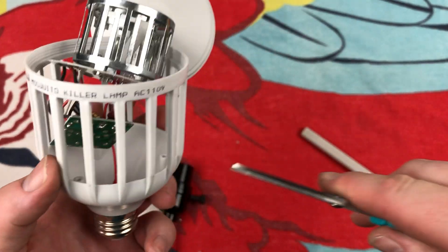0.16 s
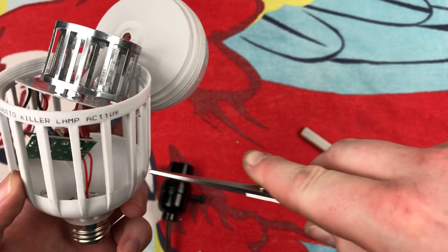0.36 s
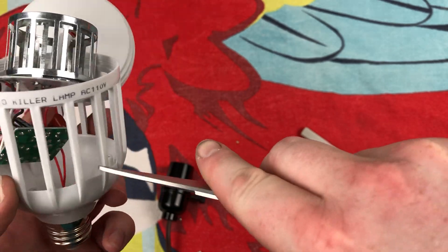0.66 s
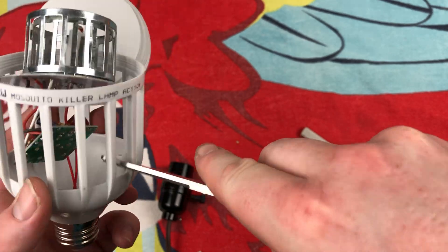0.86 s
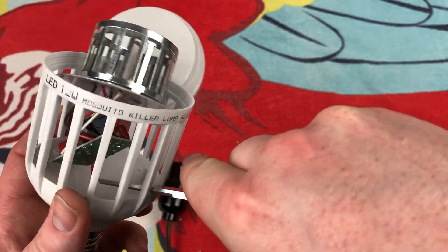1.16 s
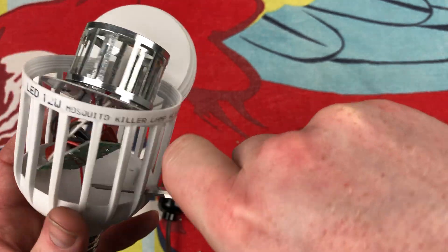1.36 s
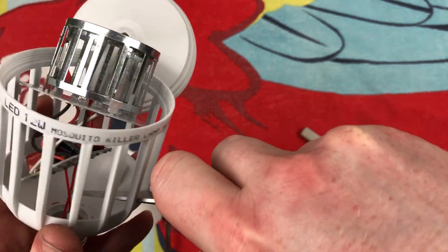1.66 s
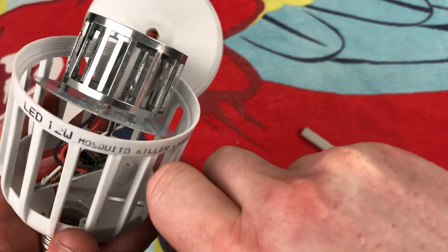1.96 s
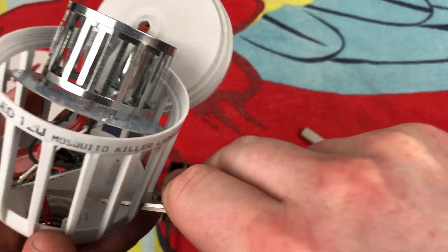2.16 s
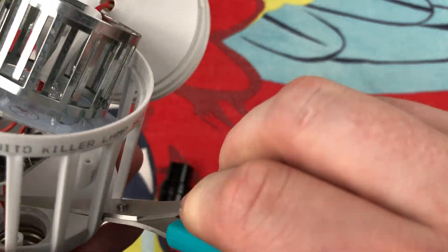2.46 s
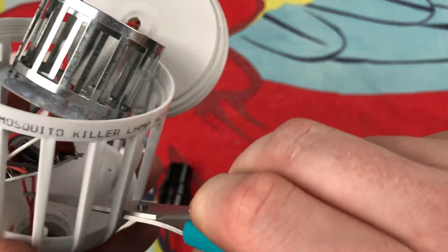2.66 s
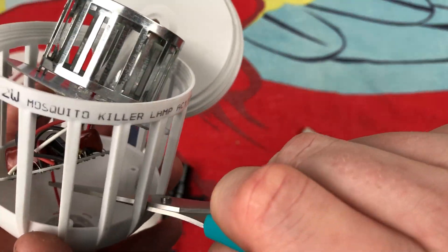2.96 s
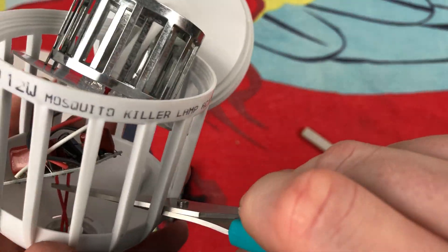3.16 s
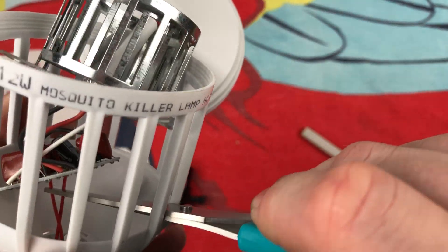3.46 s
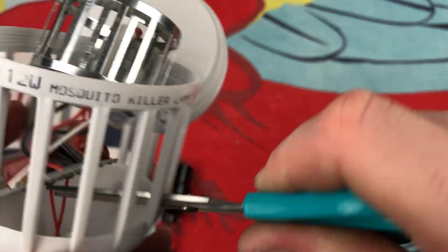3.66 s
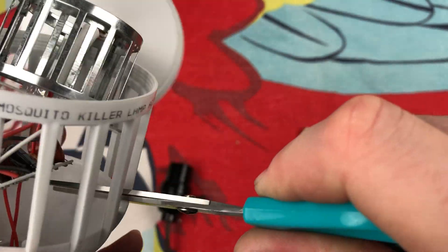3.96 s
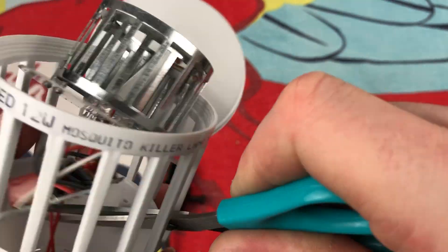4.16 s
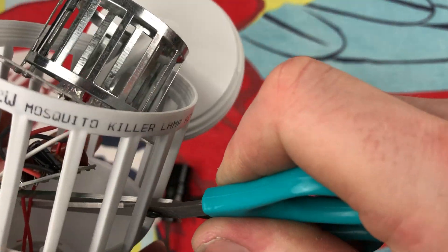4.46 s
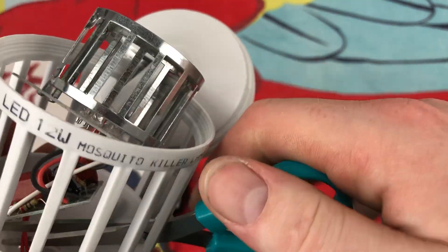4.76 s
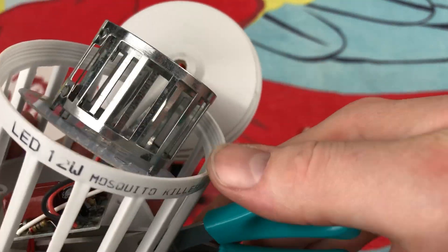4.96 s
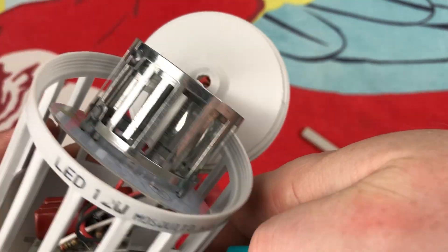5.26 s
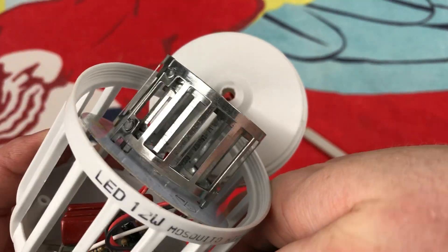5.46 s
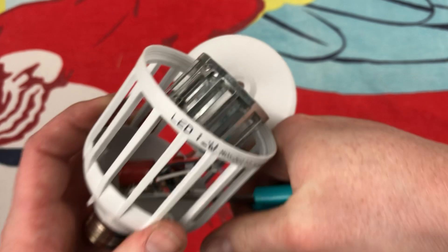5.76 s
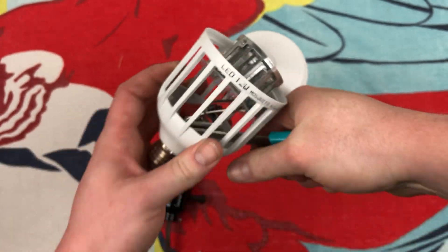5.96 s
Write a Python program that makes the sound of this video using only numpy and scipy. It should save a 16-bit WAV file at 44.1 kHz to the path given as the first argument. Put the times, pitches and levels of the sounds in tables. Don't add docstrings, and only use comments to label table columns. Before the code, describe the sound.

Steel blades rub and tick against thin plastic, handled quietly at first, then more busily, with pauses between. Light hollow thumps follow the harder touches, and the open blades briefly sing. After a sharp knock and some small fumbling, one crisp, bright snip cuts a wire and bounces off nearby walls. A few last clicks follow. Close microphone, small indoor room, soft boomy background with slight hiss and mains hum.

```python
import sys
import numpy as np
from scipy import signal
from scipy.fft import rfft, irfft
from scipy.io import wavfile
from scipy.ndimage import uniform_filter1d

SR = 44100
rng = np.random.default_rng(int(sys.argv[2]) if len(sys.argv) > 2 else 0)


def convert_level_to_amplitude(level_db):
    exponent = np.asarray(level_db, float) / 20
    return 10 ** exponent


def transcribe(u):
    v = np.clip(np.atleast_2d(u).T, -1, 1)
    q = np.round(v * 32767).astype(np.int16)
    wavfile.write(sys.argv[1], SR, q)


N = 269123
CUT_S = 5.7499

# f/Hz, level/dB, t60/s
BLADE_MODES = [(1247, -3, 0.088), (1712, -2, 0.11), (2007, 4.5, 0.064), (2800, 3.5, 0.1), (3020, 4, 0.06),
               (3780, -0.5, 0.088), (4510, -11, .03), (5355, 4.5, 0.055), (6670, -1, 0.025),
               (7810, -22, 0.032), (8900, -4, 0.023), (10130, -5.5, 0.019), (10950, -4, .04),
               (13000, -30.5, 0.018)]


def evened(x):
    return x / np.sqrt(np.mean(x ** 2) + 1e-20)


def read(points, hz):
    f, value = np.transpose(points)
    return np.interp(np.log(hz + 1), np.log(f + 1), value)


def add(mix, s, sound):
    part = mix[round(s * SR):][:len(sound)]
    part += sound[:len(part)]


def coloured(x, points):
    gain = convert_level_to_amplitude(read(points, np.fft.rfftfreq(len(x), 1 / SR)))
    return irfft(rfft(x) * gain, len(x))


def band(x, lo_hz, hi_hz):
    edges = np.clip([lo_hz, hi_hz], 20, .49 * SR)
    return signal.sosfilt(signal.butter(2, edges, "band", fs=SR, output="sos"), x)


def split(x, low_hz, high_hz):
    hz, z = np.fft.rfftfreq(len(x), 1 / SR), rfft(x)
    below_low, below_high = [1 / (1 + (hz / edge) ** 6) for edge in (low_hz, high_hz)]
    shares = (below_low, below_high - below_low, 1 - below_high)
    return [evened(irfft(z * share, len(x))) for share in shares]


def ring(hz, db, t60, size=4096):
    t = np.arange(size) / SR
    return convert_level_to_amplitude(db - 60 * t / max(t60, .002)) * np.sin(2 * np.pi * hz * t)


def wander(smooth_s):
    size = max(int(smooth_s * SR), 2)
    return evened(uniform_filter1d(uniform_filter1d(rng.standard_normal(N), size), size))


def background():
    # f/Hz, level/dB per Hz
    air_colour = [(30, -19.5), (60, -12.5), (100, -10.5), (150, -16.5), (240, -18.5), (400, -23.5),
                  (600, -30.5), (1500, -36.5), (3000, -39.5), (8700, -41), (15600, -46), (16100, -61.5)]
    # f/Hz, drift/Hz, level/dB
    room_mode = (58, 1.49, 2.2)
    # t/s, level/dB
    boom_swell = [(0.0, -63), (1.7, -59), (2.14, -65.5), (2.16, -61.5), (2.79, -63.5), (2.84, -83),
                  (3.09, -58), (3.21, -70.5), (3.69, -59.5), (3.75, -69), (4.2, -60), (4.4, -65),
                  (4.62, -63), (4.72, -71), (5.57, -60.5), (5.72, -78), (6.05, -61.5), (6.1, -76.5)]
    # f/Hz, level/dB
    hum_tones = [(120, -69), (234, -85)]
    t = np.arange(N) / SR
    air = coloured(rng.standard_normal(N), air_colour) * convert_level_to_amplitude(.8 * wander(0.083))
    air *= convert_level_to_amplitude(-69.5) / np.std(band(air, 150, 16000))

    mode_hz, drift_hz, mode_db = room_mode
    boom_level = convert_level_to_amplitude(mode_db + 2.6 * wander(0.049) + np.interp(t, *np.transpose(boom_swell)))
    boom_turns = np.cumsum(mode_hz + drift_hz * wander(0.058)) / SR
    boom = boom_level * np.sin(2 * np.pi * boom_turns)

    hum = np.zeros(N)
    for hz, db in hum_tones:
        hum += convert_level_to_amplitude(db + 1.5 * wander(0.13)) * np.sqrt(2) * np.sin(2 * np.pi * hz * t)
    return air + boom + hum


def pressure(start, length, level_db):
    rise_db_per_s, fall_db_per_s, swell_db = 1495, 1005, -0.5
    t = np.arange(N) / SR - start
    rise = np.minimum(rise_db_per_s * t, 0)
    hold = swell_db * (t / length - .5).clip(-.5, .5)
    release = swell_db / 2 - fall_db_per_s * (t - length)
    return convert_level_to_amplitude(level_db + np.minimum(rise + hold, release))


def patchy(x, depth_db):
    z = signal.stft(x, nperseg=256)[2]
    patches = uniform_filter1d(rng.standard_normal(z.shape), size=3, axis=0)
    patches = uniform_filter1d(patches, size=16, axis=1)
    return evened(signal.istft(z * convert_level_to_amplitude(depth_db * evened(patches)), nperseg=256)[1][:N])


def scrape(grit_db=2.3, lumps_db=1.0, grip_db=4.5, ringing=.38, patch_db=2.5):
    # f/Hz, level/dB per Hz
    rub_colour = [(200, -3), (700, -24), (1500, -9), (3000, 1.5), (6000, -2.5), (10000, -4.5), (15700, -11),
                  (16100, -40)]
    # f/Hz, level/dB, t60/s
    squeak_modes = [(2760, 6, 0.03), (2900, 12.5, 0.025), (3150, 7, 0.02), (8940, -1.5, 0.023),
                    (9300, -2, 0.026), (3800, 3, .01)]
    # t/s, length/s, pressure/dB, brightness/dB, cage body/dB
    strokes = [(0.0, 0.009, -55, -9, -11), (.925, 0.051, -60.5, 0.5, -1), (1.057, 0.11, -65.5, -2, -9),
               (1.181, 0.027, -62, 0.5, -7.5), (1.265, 0.026, -62, -7, -4), (1.686, 0.055, -68, -4, -5),
               (1.737, 0.016, -55.5, -21, -11), (1.972, 0.065, -57, -3.5, -12),
               (2.063, 0.017, -55.5, -26, -33), (2.161, 0.038, -67, -10, -1),
               (2.374, 0.049, -53, -5.5, -12), (2.451, 0.0085, -59.5, -14, -4.5),
               (2.489, 0.0057, -53.5, -8, -9), (3.703, 0.059, -61, -3.5, -12),
               (3.764, 0.029, -55, 1.5, -16), (3.8, 0.038, -58.5, -2, -17), (3.864, 0.029, -65.5, 5, -7),
               (3.899, 0.03, -59, 7, -10), (4.168, 0.038, -58.5, 3, -10), (4.223, 0.017, -55, 7.5, -4.5),
               (4.271, 0.0037, -47.5, -13, -8), (4.694, 0.034, -60.5, 3, -1),
               (4.735, 0.022, -54.5, 0, -5.5), (4.756, 0.028, -59, -6, -2), (5.061, 0.023, -65, -1, -6),
               (5.186, 0.0069, -63.5, 1.5, -5), (5.652, 0.032, -65, -2.5, -5.5)]
    # t/s, length/s, pressure/dB, brightness/dB
    brushes = [(0.052, 0.038, -69, -11), (0.2, 0.029, -73, 2), (0.492, 0.039, -75, -20),
               (0.666, 0.0061, -71, -18), (0.843, 0.089, -71.5, -2), (0.99, 0.078, -77.5, 2.5),
               (1.224, 0.06, -67.5, -5), (1.3, 0.021, -65, -17), (1.327, 0.04, -76, -3),
               (1.458, 0.01, -72.5, -3.5), (1.936, 0.026, -77, -11), (2.071, 0.035, -69, -8),
               (2.73, 0.036, -76.5, 0), (3.214, 0.04, -81, 2), (3.32, 0.01, -69, -6), (3.97, 0.21, -79, -4),
               (4.44, 0.015, -73, -4), (5.375, 0.013, -65.5, -5), (5.551, 0.056, -77.5, -2),
               (1.484, 0.013, -84, -17), (1.618, 0.016, -77, -8), (1.771, 0.022, -68, -25),
               (1.831, 0.009, -70, 4), (2.304, 0.028, -72, -12), (2.524, 0.0091, -64, -6),
               (2.591, 0.023, -72.5, -4), (2.802, 0.072, -74, 0), (3.25, 0.078, -69, -3),
               (3.625, 0.013, -71.5, -12), (3.915, 0.038, -60.5, -29), (4.307, 0.023, -69, -21),
               (4.593, 0.084, -73, -3), (4.774, 0.047, -68, -29), (5.213, 0.018, -66, -24),
               (5.284, 0.046, -75.5, -3), (5.424, 0.0038, -70, 0), (5.457, 0.01, -69, -7),
               (6.058, 0.0045, -71, 8)]
    # t/s, length/s, level/dB
    songs = [(1.005, 0.084, -75), (1.212, 0.13, -83), (2.433, 0.057, -76), (2.598, 0.045, -76),
             (2.742, 0.027, -65.5), (2.818, 0.061, -71), (2.941, .03, -70.5), (3.027, 0.12, -78),
             (3.16, 0.066, -78), (3.24, 0.085, -65), (3.54, 0.14, -81), (3.71, 0.12, -63),
             (4.225, 0.0099, -53), (4.549, 0.075, -68.5), (4.651, 0.018, -67), (4.695, 0.058, -57.5),
             (1.06, 0.072, -88), (4.475, 0.05, -76), (5.05, 0.18, -74), (5.3, 0.084, -69),
             (6.043, 0.071, -60.5), (2.56, .8, -86), (4.5, .2, -80)]
    slips = rng.standard_normal(N) * convert_level_to_amplitude(grit_db * wander(0.0012) + lumps_db * wander(0.005))
    modes = np.zeros(N)
    for hz, db, t60 in BLADE_MODES:
        gripped = slips * convert_level_to_amplitude(grip_db * wander(0.026))
        modes += signal.oaconvolve(gripped, ring(hz, db, .5 * t60))[:N] / np.sqrt(t60)
    rub = patchy(coloured(slips, rub_colour), patch_db) + ringing * evened(modes)
    body, mid, top = split(band(rub, 250, 21000), 1200, 6500)
    squeak = evened(signal.oaconvolve(slips, sum(ring(*m) for m in squeak_modes))[:N])

    out = np.zeros(N)
    brush_body_db = -8
    for *stroke, bright_db, body_db in list(strokes) + [(*row, brush_body_db) for row in brushes]:
        out += pressure(*stroke) * (mid + convert_level_to_amplitude(bright_db) * top + convert_level_to_amplitude(body_db) * body)
    for row in songs:
        out += pressure(*row) * squeak
    return out


def lock(start, end, hz, level_db, spread=0.058):
    size = round((end - start) * SR)
    tone = band(rng.standard_normal(8192), (1 - spread) * hz, (1 + spread) * hz)[:size]
    return start, convert_level_to_amplitude(level_db) * evened(tone) * signal.windows.tukey(size, .6)


def add_locks(near):
    locked_tones = [(.925, 0.975, 7670, -59), (1.074, 1.17, 8500, -65), (2.37, 2.44, 6000, -69),
                    (1.977, 2.034, 5540, -61), (1.979, 2.033, 8700, -60.5), (2.733, 2.773, 9600, -72.5),
                    (3.777, 3.805, 3840, -55), (3.855, 3.94, 5540, -56.5), (4.548, 4.64, 3350, -68),
                    (4.61, 4.685, 7100, -73.5), (4.65, 4.69, 3940, -69), (4.722, 4.752, 5000, -62),
                    (1.265, 1.3, 7300, -63), (1.275, 1.295, 8400, -66), (1.308, 1.325, 10900, -62),
                    (2.74, 2.78, 3960, -76), (1.17, 1.21, 5800, -63.5), (1.07, 1.12, 4470, -66),
                    (.925, .975, 870, -61), (5.652, 5.67, 7600, -65), (5.417, 5.432, 6780, -66.5),
                    (1.69, 1.77, 10000, -80), (0.055, 0.074, 3500, -66.5), (3.02, 3.16, 8800, -81.5),
                    (0.66, 0.68, 6300, -71), (2.19, 2.23, 3000, -74.5), (5.042, 5.09, 7600, -69),
                    (6.066, 6.078, 3000, -43.5), (2.38, 2.4, 5100, -55), (2.402, 2.43, 6800, -58),
                    (4.77, 4.784, 3800, -59), (4.772, 4.786, 2600, -56), (1.263, 1.287, 1200, -60),
                    (.924, .938, 3300, -58), (.93, .952, 5200, -60), (5.762, 5.787, 2050, -45)]
    for row in locked_tones:
        add(near, *lock(*row))


def tick(s, blow_db, hz, thump_db, bright_db):
    t = np.arange(4096) / SR
    noise, chance = rng.standard_normal(4096), rng.standard_normal(len(BLADE_MODES) + 1)
    crack = noise * (np.exp(-t / 0.001) + 0.45 * np.exp(-t / 0.0068))
    crack = 1.23 * evened(crack) + 0.45 * evened(band(crack, 0.73 * hz, 1.38 * hz))
    blades = sum(ring(f, db + 7.5 * k, 0.8 * d) for k, (f, db, d) in zip(chance, BLADE_MODES))
    t60 = 1.2 / np.sqrt(hz) + 0.058 * (abs(hz - 2000) < 90)
    clink = evened(crack) + 0.18 * evened(blades) + 0.54 * evened(ring(hz, 0, t60))

    knock = ring(400 * convert_level_to_amplitude(0.19 * chance[-1]), 0, 0.045)
    knock += ring(160, -.4 * (blow_db + 80), 0.088)
    knock += ring(857, -0.66, 0.022) + ring(683, -6.0, 0.024)

    parts = evened(band(band(clink, 540, 6130), 450, 6700))
    parts += convert_level_to_amplitude(bright_db) * evened(band(band(clink, 6170, 12700), 4800, 15400))
    parts += convert_level_to_amplitude(thump_db) * evened(knock)
    return s, convert_level_to_amplitude(blow_db - 17.0) * parts * np.minimum(t / 0.000095, 1)


def add_ticks(near):
    # t/s, blow/dB, ring f/Hz, brightness/dB
    clinks = [(0.056, -53, 5600, -5), (0.1816, -53, 3020, -8), (0.1938, -70.5, 9600, 25),
              (1.1732, -55.5, 4660, -1), (1.4962, -50, 1710, -18), (1.7331, -43.5, 3320, -7.5),
              (1.938, -53.5, 1680, -30), (1.9842, -57, 3070, -9), (2.0561, -45, 2000, -16),
              (2.0699, -43, 2900, 3), (2.1641, -53.5, 4880, -0.5), (2.3543, -49, 3930, -5.5),
              (2.3625, -40, 1640, -7.5), (2.403, -40, 2000, -8), (2.4518, -47.5, 1690, -9),
              (2.4837, -40, 1590, -8), (2.8022, -68.5, 10800, 15.5), (2.849, -58, 3800, -7),
              (2.8498, -71, 10400, 15), (2.803, -66, 4800, -8), (0.8444, -53.5, 4350, -8),
              (0.9733, -50, 2900, -15), (1.2644, -58.5, 11000, 8.5), (3.766, -53, 6500, 1),
              (3.788, -52, 5600, -1), (4.2233, -47.5, 8700, -1), (3.7624, -60, 7550, 8),
              (3.8258, -41.5, 1995, -23), (4.2386, -37, 6200, -23), (4.2677, -44.5, 4230, -2),
              (4.3027, -57, 2920, -4), (5.0093, -61, 11000, 1.5), (5.212, -51, 3080, -22),
              (5.3425, -46, 3140, -19), (6.036, -54.5, 2900, 3.5), (6.047, -50.5, 4320, -9),
              (6.0684, -58, 5770, 9.5), (3.345, -71, 9550, 6), (1.31, -63, 8150, 4), (1.65, -71, 8450, 2),
              (1.458, -65, 9200, -4), (2.897, -80, 10600, 10), (4.78, -55, 6530, -7),
              (3.7457, -60, 4000, 6)]
    # t/s, blow/dB, ring f/Hz, thump/dB
    knocks = [(0.1648, -61, 940, 3), (0.432, -50, 3450, -8), (0.7957, -61.5, 3730, -6),
              (0.8187, -57.5, 1630, -2), (0.8455, -54.5, 846, 5), (0.9419, -48, 860, -26),
              (0.971, -47, 1030, -1.5), (1.2262, -53, 2940, 3.5), (1.2658, -45.5, 940, -12),
              (2.031, -45.5, 898, -11), (2.1474, -50, 1963, -6.5), (2.524, -56, 1420, -7),
              (2.612, -61, 2820, 0), (3.779, -49.5, 1970, -4), (3.907, -44, 2900, -8),
              (3.9285, -40, 3430, -7.5), (4.159, -50, 3500, -4.5), (4.2174, -44, 1720, 0),
              (4.2241, -37, 5800, -4.5), (4.492, -47.5, 3350, -5), (4.6888, -47, 896, -14),
              (4.754, -41, 850, -4), (4.7707, -47.5, 1210, -9.5), (4.857, -53.5, 1970, -4.5),
              (5.123, -56.5, 790, 1.5), (5.184, -53.5, 790, -26), (5.371, -53.5, 2000, -6),
              (5.525, -53.5, 3260, -5.5), (5.6812, -52.5, 1500, -24)]
    # t/s, blow/dB, ring f/Hz
    touches = [(0.342, -61.5, 744), (0.664, -57.5, 2690), (0.672, -55.5, 2640), (1.054, -52.5, 2800),
               (1.404, -54, 1710), (1.4899, -54.5, 2620), (1.628, -62.5, 4580), (1.679, -57.5, 1970),
               (1.6843, -66, 1870), (1.829, -67, 5370), (1.852, -57.5, 1610), (2.2615, -53, 2000),
               (2.8403, -58, 2760), (4.023, -63, 1840), (3.1413, -53.5, 2650), (3.626, -66, 3750),
               (4.321, -57.5, 2220), (4.4716, -59, 2740), (5.292, -59.5, 1480), (5.318, -65, 6600),
               (5.3252, -49.5, 1630), (5.422, -67, 6600), (5.452, -60, 2870), (5.604, -54.5, 2600),
               (5.919, -53, 1620), (0.9982, -57, 1520), (1.021, -58, 2700), (1.502, -54, 1265),
               (1.65, -58.5, 1250), (1.891, -65, 1860), (4.096, -70, 4200), (4.116, -62, 3570),
               (4.617, -56, 3150), (5.433, -62, 1410), (5.474, -76, 4400), (5.562, -64, 6800),
               (5.684, -60, 4000), (.054, -57, 2050), (.603, -65, 2700), (.645, -67, 2900)]
    for *blow, bright_db in clinks:
        add(near, *tick(*blow, -20, bright_db))
    for s, blow_db, hz, thump_db in knocks:
        bright_db = -21.5 + 0.64 * (blow_db + 50)
        add(near, *tick(s, blow_db, hz, thump_db, bright_db))
    for row in touches:
        add(near, *tick(*row, -13.5, -19.5))


def thud(s, db, hz, sag):
    sag_cycles, dying_cycles = .7, 5.2
    swings = np.arange(4096) / SR * hz
    turns = swings + sag * sag_cycles * (1 - np.exp(-swings / sag_cycles))
    return s, convert_level_to_amplitude(db - 60 * swings / dying_cycles) * np.sin(2 * np.pi * turns)


def add_thuds(near):
    # t/s, level/dB, f/Hz, share higher at the start [ratio]
    bumps = [(2.15, -41.5, 187, 0), (2.355, -48, 182, 0), (2.617, -49.5, 197, 0), (3.913, -40, 200, .3),
             (4.166, -43, 190, 0), (4.232, -38, 167, 0), (4.498, -40.5, 240, 0), (4.7541, -24.5, 270, 2.6),
             (5.234, -47, 181, 0), (3.929, -46, 220, 2.5), (.973, -47, 280, 2.5), (5.7635, -34, 640, 0),
             (5.771, -39, 566, 0)]
    for row in bumps:
        add(near, *thud(*row))


def snap():
    # t/s, peak level/dB, centre
    # f/Hz, length/s, roughness [ratio]
    bursts = [(0.9722, -49, 2600, 0.00027, 0.5), (2.0704, -30, 5800, 0.00017, 0.6),
              (2.483, -37, 7460, 0.00026, 0.6), (4.7538, -19.5, 7000, 0.00012, 0.5),
              (5.7277, -33, 8200, 0.00035, 0.8), (5.731, -47, 3140, 0.0054, 0.84),
              (5.7392, -41, 8600, 0.0004, 0.6), (5.744, -48, 3100, 0.004, 0.2),
              (5.7494, -5, 3100, 0.00017, 0.1), (5.7501, -8, 9200, 0.00032, 0.4),
              (5.7504, -10, 13700, .0002, 0.4), (5.7506, -6.5, 7150, 0.0004, 0.3),
              (5.7514, -23, 7500, 0.001, 1.2), (5.7520, -31, 2100, 0.00049, 0.8),
              (5.756, -47, 112, 0.0033, 0.2), (5.7491, -16, 5200, .00018, .4),
              (5.7503, -11, 4900, .0002, .3), (2.4021, -35, 2900, .0004, .4), (2.378, -41, 5000, .0005, .6),
              (1.2256, -44, 5000, .0003, .7), (.9738, -45, 1100, .001, .3), (.944, -44, 5200, .0004, .6),
              (3.7675, -38, 9200, .0004, .6), (3.788, -39, 4000, .0006, .5), (3.863, -44, 5300, .0007, .5),
              (3.9068, -37, 3000, .0008, .4), (3.9285, -40, 3600, .0005, .5)]
    # f/Hz, level/dB, t60/s
    shut_modes = [(7200, -20, 0.016), (7400, -31, 0.05), (8600, -26, 0.016), (10900, -29, .016),
                  (2080, -33, .02)]
    out, t = np.zeros(N), np.arange(-512, 512) / SR
    for s, peak_db, hz, length, rough in bursts:
        noise = evened(band(rng.standard_normal(1024), 0.5 * hz, 1.43 * hz))
        wave = (1 - rough) * np.cos(2 * np.pi * hz * t) + .5 * rough * noise
        burst = wave * np.exp(-.5 * (t / length) ** 2)
        add(out, s + t[0], convert_level_to_amplitude(peak_db) * burst / abs(burst).max())
    add(out, CUT_S, sum(ring(*m) for m in shut_modes))
    return out


def spread_cut():
    # f/Hz, level/dB per Hz
    cut_colour = [(70, -24), (150, -19), (380, -11), (660, -20), (1200, -20), (2000, -12), (3500, -12),
                  (5500, -6.5), (6600, -1), (7300, 2), (8400, -5), (10000, -10), (15300, -13), (16300, -55)]
    click = 1. * (np.arange(N) == round(CUT_S * SR))
    spread = coloured(click, cut_colour)
    spread *= np.arange(N) > (CUT_S - .0006) * SR
    return spread * convert_level_to_amplitude(1.0) / np.linalg.norm(spread)


def walls(x, delay_s=0.012, table_db=-8.5):
    # f/Hz, t60/s
    room_t60 = [(150, 0.3), (660, 0.39), (1740, 0.33), (4590, 0.33), (6300, 0.23), (7300, 0.37),
                (8600, 0.29), (12100, 0.24)]
    size = SR // 2
    taps = np.zeros(size)
    at = np.arange(80, size - 8, 8)
    taps[at + rng.integers(0, 8, len(at))] = rng.choice([-1., 1.], len(at))
    hz, t, z = signal.stft(taps, SR, nperseg=256)
    decay = convert_level_to_amplitude(-60 * t / read(room_t60, hz)[:, None])
    tail = signal.istft(z * decay, SR, nperseg=256)[1]
    tail *= np.where(np.arange(len(tail)) < delay_s * SR, convert_level_to_amplitude(table_db), 1)
    return signal.oaconvolve(x, tail / np.linalg.norm(tail))[:N]


def scene():
    near = scrape()
    add_ticks(near)
    add_thuds(near)
    add_locks(near)
    reflected = walls(convert_level_to_amplitude(-19.5) * near + spread_cut())
    return (near + snap() + reflected + background())[None]


def band_limit(x):
    return signal.sosfilt(signal.butter(12, 17090, fs=SR, output="sos"), x)


def record(dry):
    cut = signal.sosfilt(signal.butter(6, 44, "high", fs=SR, output="sos"), dry)
    low_pass = signal.firwin(511, 16920, window=("kaiser", 9), fs=SR)
    cut = signal.oaconvolve(cut, low_pass[None], "same")
    return band_limit(cut)


dry = scene()
out = record(dry)
transcribe(out)
```